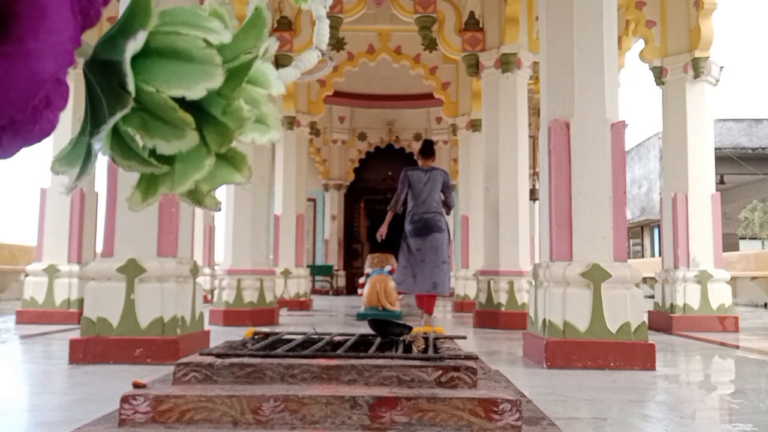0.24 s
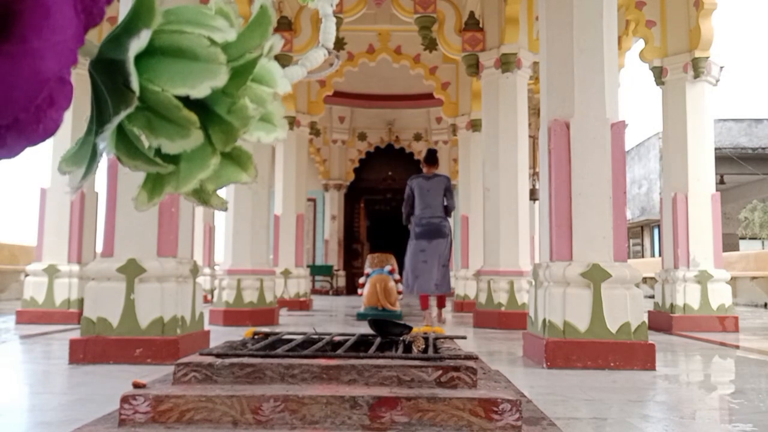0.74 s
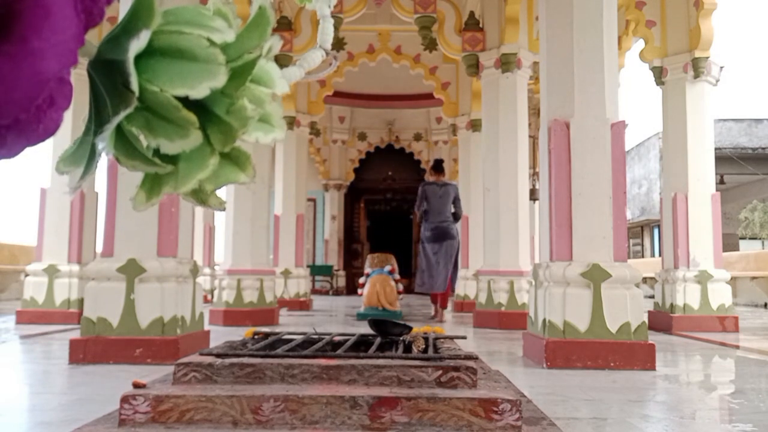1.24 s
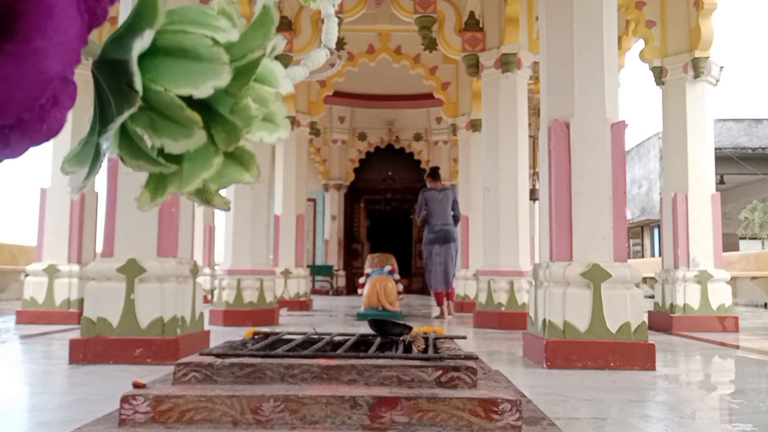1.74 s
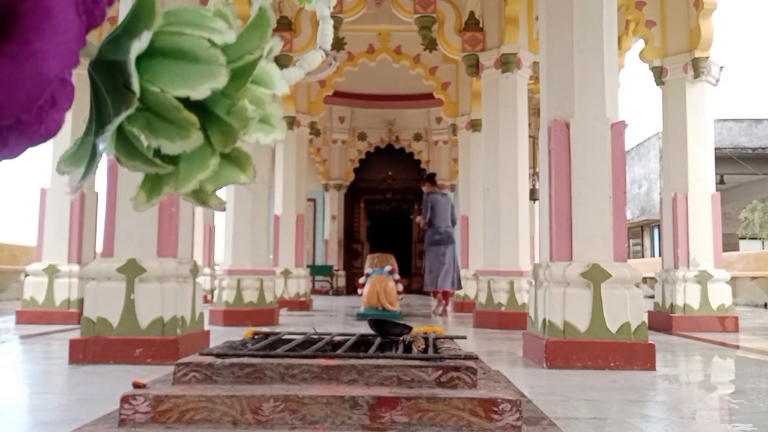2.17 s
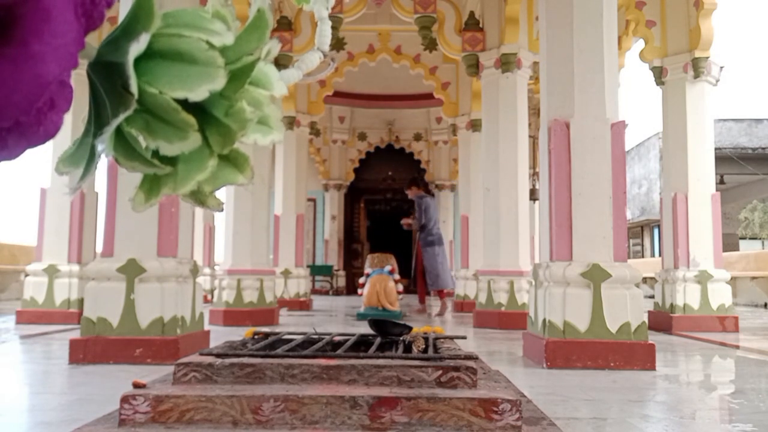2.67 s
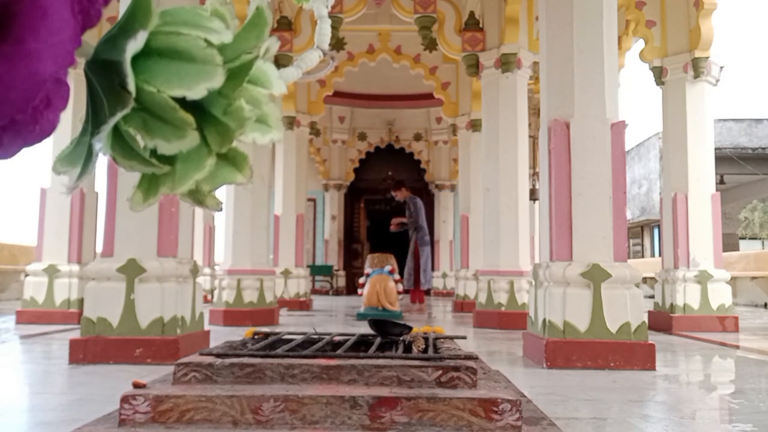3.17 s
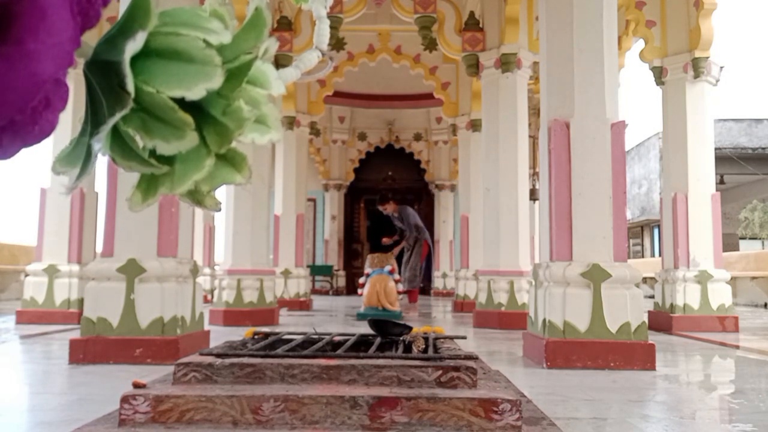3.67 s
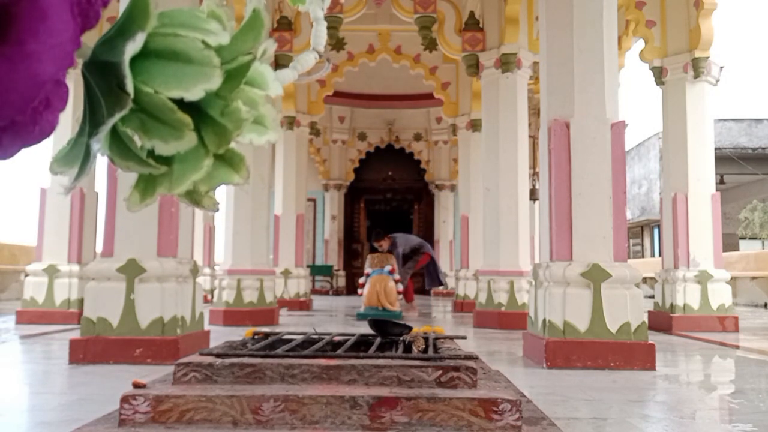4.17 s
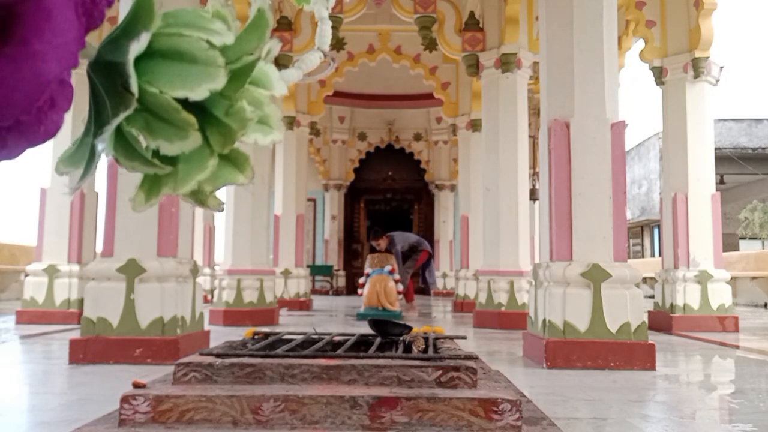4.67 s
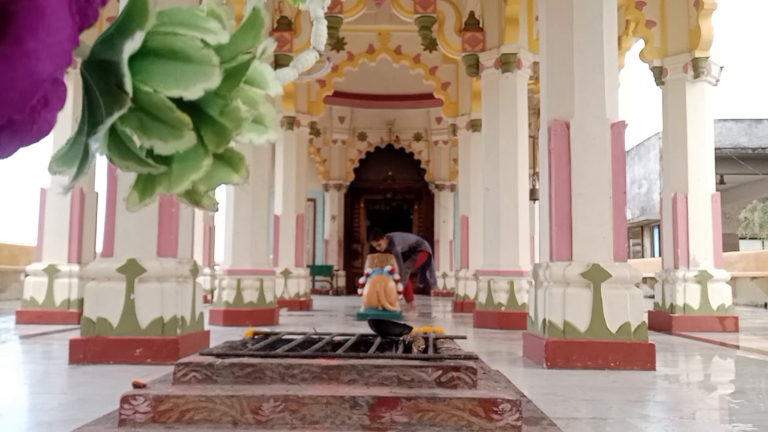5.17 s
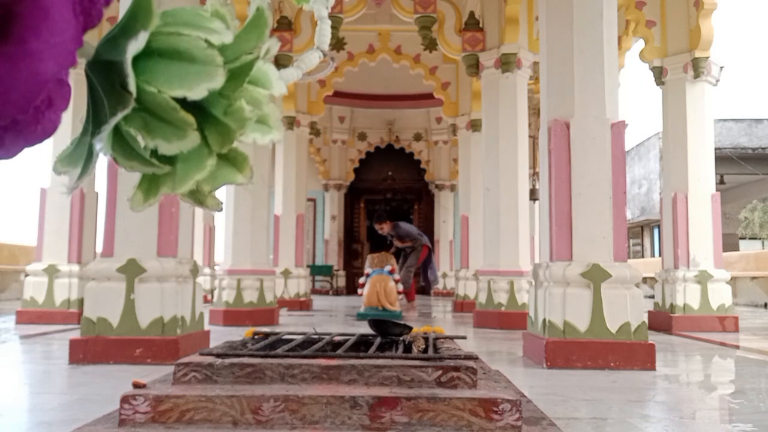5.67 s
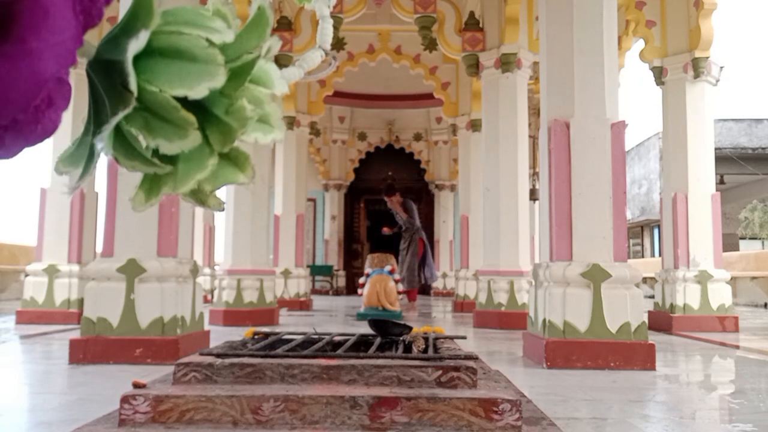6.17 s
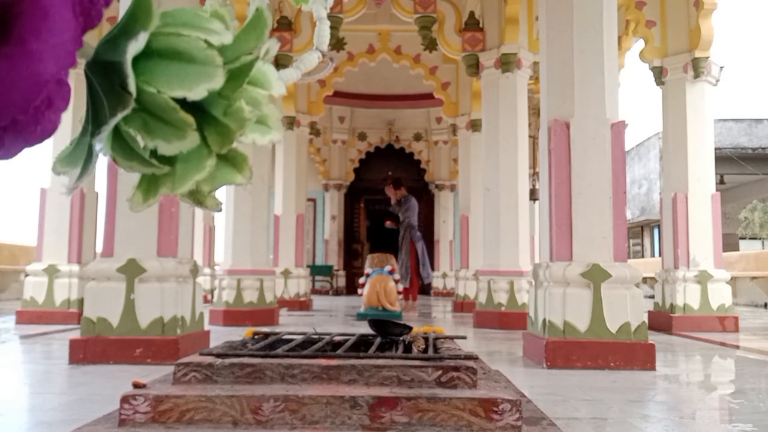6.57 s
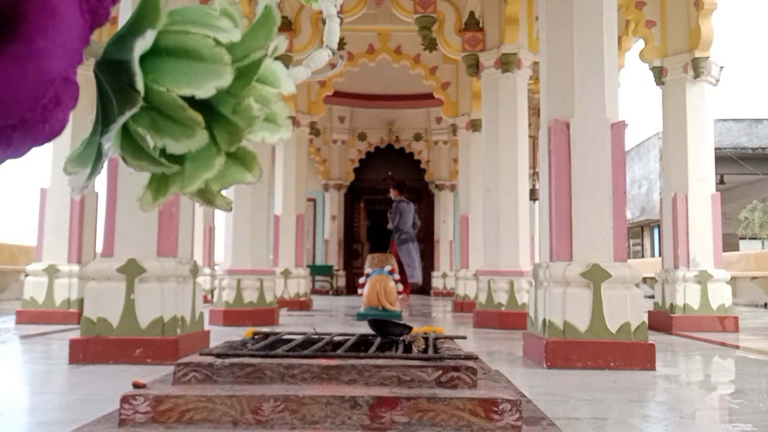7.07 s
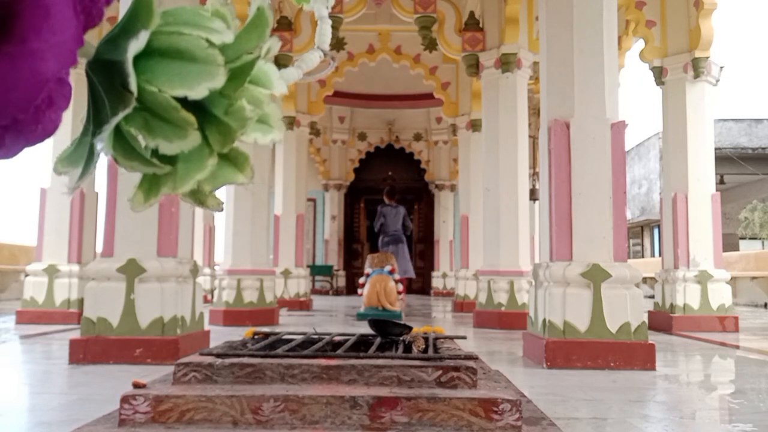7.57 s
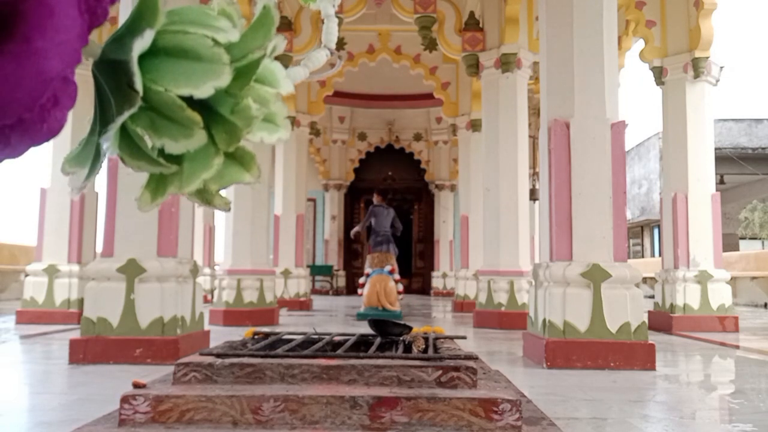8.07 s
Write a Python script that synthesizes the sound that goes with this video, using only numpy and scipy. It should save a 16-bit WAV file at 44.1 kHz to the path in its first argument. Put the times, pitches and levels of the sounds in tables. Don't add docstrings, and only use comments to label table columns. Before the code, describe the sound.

A lively outdoor bird scene in a reverberant pillared porch, picked up in stereo by a phone lying on the floor. Crisp ticks and short chirps run throughout, with a buzzing caller every second or so and a close left-hand singer giving two brief phrases. Low town rumble and a far flock stay behind; a distant motor swells mid-way, drops away after 5 seconds, then returns near the end.

```python
import sys
import numpy as np
from scipy import signal
from scipy.fft import rfft, irfft, next_fast_len
from scipy.io import wavfile
from scipy.ndimage import uniform_filter1d, minimum_filter1d

SR = 44100
rng = np.random.default_rng(int(sys.argv[2]) if len(sys.argv) > 2 else 0)


def rack_gain(trim_db):
    fader = np.asarray(trim_db, float)
    return 10 ** (fader / 20)


def materialize(psi):
    bounded = np.clip(np.atleast_2d(psi).T, -1, 1)
    quanta = np.round(bounded * 32767).astype(np.int16)
    wavfile.write(sys.argv[1], SR, quanta)


N = 366471
T = np.arange(N) / SR

# f/Hz, level/dB per Hz
RUMBLE_SPECTRUM = [(13, -53), (22, -33), (40, -17), (52, -15), (65, -7), (103, -3), (140, 1), (152, -0.5),
                   (178, -5.5), (226, -15), (300, -15), (390, -21), (660, -120)]
TOWN_SPECTRUM = [(120, -24), (200, -1.5), (244, -9.5), (425, -6), (508, -6.5), (687, -12), (878, -10),
                 (1110, -12.5), (1460, -16.5), (1900, -10.5), (2470, -17), (4180, -120)]
FLOCK_SPECTRUM = [(1200, -16), (1600, -19), (2060, 2.5), (2400, 7), (3300, 1), (4000, 1), (6600, -0.5),
                  (9000, -10), (11000, -18.5), (14000, -34)]
WHINE_SPECTRUM = [(400, -32), (445, -3.5), (465, 6.5), (490, -6), (515, -1), (560, -7.5), (650, -9),
                  (720, -35)]
# f/Hz, likeness/0-1
LIKENESS = [(25, .9), (60, 0.98), (130, 0.88), (290, 0.76), (640, 0.24), (1400, 0)]
# t/s, pitch f/Hz, hum level/dB
MOTOR = [(0.0, 139.9, -49), (1.48, 142.1, -50.5), (1.83, 137.2, -52), (2.03, 158.9, -51.5),
         (2.82, 159.4, -50), (2.92, 138.3, -55), (3.66, 143.2, -38.5), (4.16, 144.4, -36.5),
         (4.93, 138.2, -43), (5.34, 139.2, -81), (5.97, 143.7, -80), (6.57, 159.6, -51),
         (6.87, 139.2, -100), (7.12, 146, -73), (7.48, 135, -50), (7.68, 151.3, -41), (8.31, 157.5, -50)]
# t/s, level/dB
BREEZE = [(0.0, -56.5), (1.6, -58.5), (2.03, -54), (2.82, -56), (3.66, -54.5), (4.16, -50), (4.93, -54),
          (5.34, -54.5), (5.97, -61), (6.87, -59), (7.17, -48), (7.48, -54), (8.31, -59.5)]
# t/s, level/dB
FLOCK = [(0.0, -46), (1.3, -56), (1.83, -50.5), (2.92, -51.5), (3.66, -48.5), (4.16, -44.5), (4.93, -54),
         (5.34, -50.5), (5.97, -59.5), (6.57, -54), (6.87, -55), (7.15, -44.5), (7.48, -49.5),
         (7.68, -50.5), (8.31, -58.5)]
# t/s, peak level/dB
THIN_TICKS = [(.283, -33.5), (.3104, -36), (1.0939, -22), (2.3037, -29.5), (2.3184, -38), (3.1242, -26.5),
              (3.3089, -33), (3.4056, -33.5), (4.3356, -29), (4.6744, -19), (6.5504, -20.5),
              (6.3094, -26.5), (6.4809, -32), (6.6954, -25.5), (6.9881, -32.5), (7.5137, -15.5),
              (7.7068, -29.5), (8.2747, -26.5)]
# t/s, peak level/dB
FULL_TICKS = [(.0024, -25.5), (.0202, -40), (.2039, -35), (.2185, -38), (.036, -23.5), (.5766, -19.5),
              (.9774, -24.5), (1.8806, -26.5), (1.95, -30), (2.0227, -33), (2.5163, -32), (2.9872, -35.5),
              (3.045, -28.5), (3.489, -36), (2.0787, -33.5), (3.7579, -27.5), (3.8506, -37.5),
              (3.9828, -29.5), (4.14, -32.5), (4.3203, -23.5), (4.5986, -27.5), (5.0503, -24.5),
              (5.4578, -26), (5.6354, -37.5), (5.8264, -29), (5.8435, -40), (6.6081, -24), (6.663, -42),
              (6.718, -29), (6.92, -32.5), (7.1979, -27.5), (7.4104, -43), (7.8042, -27.5)]
# t/s, peak level/dB
OPEN_TICKS = [(.5415, -43), (2.818, -36.5), (6.7336, -32), (7.1117, -32), (1.2065, -28.5), (1.6165, -38.5),
              (3.1068, -37), (3.1536, -29), (3.723, -28.5), (5.5023, -27.5), (5.8666, -50), (6.148, -29.5),
              (7.8474, -35.5)]
# t/s, peak level/dB, top minus edge level/dB
AIRY_TICKS = [(.352, -20, -13), (.5112, -39, 0), (.7243, -23.5, -11), (2.1845, -23.5, -4.5),
              (2.576, -30, -10.5), (2.665, -27, -16), (3.7424, -40.5, -6), (5.3325, -15, -25),
              (6.0861, -29, -12.5), (6.772, -26.5, 0), (7.2554, -21.5, -15.5), (8.034, -36, -1)]
# delay t/s, left level/dB, right level/dB
TICK_REPEATS = [
    (.0100, -14, -15),
    (.0157, -6, -3),
    (.0175, 1, 3.5),
    (.0236, -13, -15),
    (.0314, -12, -14),
    (.0398, -11, -12),
    (.0445, -13, -15),
]
# t/s, lower voice f/Hz, upper voice f/Hz, voices level/dB, rasp level/dB
BUZZES = [
    (.762, 4940, 5278, -45, -48),
    (1.711, 4933, 5390, -43, -42),
    (2.665, 4860, 5432, -48, -46),
    (4.021, 4945, 5404, -45.5, -44),
    (5.034, 4760, 5252, -45, -48.5),
    (6.112, 4946, 5250, -45.5, -48.5),
    (7.035, 5050, 5555, -47.5, -48.5),
]
# t/s, length t/s, from f/Hz, to f/Hz, rms level/dB
RISES = [(0.015, 0.04, 2087, 2447, -37), (.252, 0.026, 2350, 2760, -50), (.35, 0.025, 1940, 2590, -45),
         (1.232, 0.033, 1957, 2510, -50), (1.855, 0.044, 2200, 2420, -50), (2.553, 0.0053, 3000, 3570, -37),
         (2.997, 0.032, 2250, 2790, -42.5), (3.178, 0.026, 1704, 1950, -49), (3.5, 0.1, 2870, 3240, -48.5),
         (4.494, 0.19, 1895, 2090, -55.5), (3.878, 0.047, 3270, 3710, -42), (4.031, 0.057, 2180, 2804, -37),
         (4.605, 0.045, 2287, 2620, -44.5), (4.646, 0.049, 2600, 3180, -45.5),
         (4.714, 0.046, 1953, 2230, -45.5), (4.924, 0.019, 1810, 1920, -52),
         (6.377, 0.033, 2017, 2660, -56), (6.832, 0.08, 1860, 2090, -54.5),
         (7.448, 0.023, 2120, 2330, -45.5), (7.473, 0.018, 2470, 2860, -43.5),
         (8.052, 0.019, 2270, 2700, -54), (8.214, 0.026, 2047, 2680, -47)]
# t/s, length t/s, from f/Hz, to f/Hz, rms level/dB
FALLS = [(0.074, 0.011, 3030, 2710, -40), (0.216, 0.0087, 3240, 2060, -35.5),
         (1.015, 0.019, 1985, 1770, -52), (1.408, 0.031, 2410, 2210, -55),
         (1.443, 0.0283, 2205, 1810, -49.5), (1.962, 0.013, 3350, 2320, -46),
         (2.295, 0.023, 2115, 1770, -48), (2.591, 0.019, 3330, 3090, -41), (3.452, 0.0215, 1995, 1720, -49),
         (3.657, 0.061, 2565, 2194, -44), (4.113, 0.032, 3370, 3090, -44), (4.706, 0.027, 3325, 3214, -40),
         (7.518, 0.031, 2370, 2250, -48), (5.217, 0.0063, 3080, 2370, -44), (6.487, 0.032, 3060, 2800, -53),
         (7.003, 0.044, 2450, 2040, -56), (7.568, 0.029, 2270, 2000, -45), (7.611, 0.041, 2250, 2213, -45),
         (7.716, 0.1, 1906, 1797, -56), (7.853, 0.042, 2050, 2050, -68), (7.805, 0.031, 2215, 1997, -44),
         (8.027, 0.037, 2660, 2540, -47), (8.045, .016, 2490, 2250, -46), (8.146, 0.029, 2270, 2080, -54),
         (8.179, 0.045, 2080, 2030, -53), (8.272, 0.031, 2250, 1970, -47)]
# t/s, length t/s, f/Hz, rms level/dB, extra echo level/dB
PEEPS = [(0.082, 0.024, 2717, -41, -4), (.125, 0.091, 2764, -48, -2), (0.22, 0.013, 2157, -39.5, -8),
         (.235, 0.059, 2203, -49, -11), (0.632, 0.027, 3480, -58, -1), (.69, 0.04, 3520, -47, -7),
         (.762, .015, 3480, -60, -2), (1.369, 0.14, 4550, -66, -5), (1.5, 0.2, 4730, -65, 1),
         (1.537, 0.049, 1940, -47, -12), (1.91, 0.11, 4790, -55, -3), (3.425, 0.026, 2360, -38, -5),
         (3.925, 0.051, 3650, -54, -3), (3.2, 0.092, 1960, -49.5, -12), (3.2, 0.063, 1760, -55, -9),
         (5.195, 0.017, 3275, -44, -6), (6.182, 0.054, 3125, -51, -14), (6.886, 0.055, 2790, -56, -14),
         (7.064, 0.039, 2475, -40.5, -24), (7.11, 0.17, 1638, -54, -3.5), (7.67, 0.048, 1953, -49.5, -4),
         (7.615, .04, 1940, -47.5, -10), (8.18, 0.028, 2350, -54, -5), (7.98, 0.025, 2800, -60, -6)]
# t/s, length t/s, from f/Hz, to f/Hz, rms level/dB
SONG = [(2.07, 0.017, 2700, 2720, -38), (2.084, 0.025, 2757, 2230, -33.5), (2.1, 0.012, 2180, 3170, -35.5),
        (2.148, 0.014, 3070, 3200, -50), (2.252, 0.014, 2784, 2340, -35), (2.271, .01, 2320, 2025, -35),
        (2.35, .013, 2185, 3210, -34), (2.367, 0.015, 3315, 2880, -44), (2.378, 0.082, 2965, 2259, -37.5),
        (2.609, 0.021, 2450, 2246, -50), (5.284, 0.019, 2890, 2670, -47), (5.302, 0.0243, 2730, 2424, -39),
        (5.321, 0.0094, 2456, 2150, -36.5), (5.327, 0.0116, 2330, 2990, -33.5),
        (5.479, 0.012, 3040, 2460, -34), (5.487, 0.016, 2405, 2050, -34), (5.437, 0.033, 2294, 2760, -45),
        (5.551, 0.014, 2173, 3030, -34.5), (5.557, 0.068, 3000, 2466, -36.5),
        (5.635, 0.026, 2725, 2143, -37)]
# delay t/s, left level/dB, right level/dB
FAR_WALLS = [
    (.036, -11, -12),
    (.062, -8, -9),
]
# f/Hz, level/dB
LEFT_COLOUR = [(300, -0.5), (1300, 8.5), (2400, 5), (5000, 4.5), (6700, 3), (7500, -4), (8300, -8),
               (9000, -32), (10000, -10.5), (14000, -36), (15600, -23), (16400, -44)]
RIGHT_COLOUR = [(300, -0.5), (1300, 6), (2400, 1), (5000, 2), (6700, -6), (8200, 0.5), (9300, 1),
                (10200, -3.5), (11500, -10.5), (14000, -27), (15600, -9), (16400, -47)]
# f/Hz, left share/0-1, right share/0-1
EMPTY_TREBLE = [(8000, 0, 0), (8700, .6, 0), (9400, .7, .05), (10300, .75, .55), (15000, .7, .6)]

SIDE_LAG, FRONT_LAG = 14, 17


def unit(x):
    return x / np.sqrt(np.mean(x ** 2))


def on_log(hz, table):
    table_hz, values = np.transpose(table)
    return np.interp(np.log(hz + 1), np.log(table_hz), values)


def colour(x, table):
    size = next_fast_len(N)
    gain = rack_gain(on_log(np.fft.rfftfreq(size, 1 / SR), table))
    return irfft(rfft(x, size) * gain, size)[..., :N]


def band(x, hz, width_hz):
    edges = [hz - width_hz / 2, hz + width_hz / 2]
    return signal.sosfilt(signal.butter(1, edges, "band", fs=SR, output="sos"), x)


def walk(rate, size=N):
    hold = int(SR / rate)
    knots = np.repeat(rng.standard_normal(size // hold + 2), 16)
    knots = uniform_filter1d(uniform_filter1d(knots, size=16), size=16)
    return 1.4 * np.interp(np.arange(size) * 16 / hold, np.arange(len(knots)), knots)


def follow(table, column=1):
    columns = np.transpose(table)
    return np.interp(T, columns[0], columns[column])


def late_left(x, lag):
    return np.array([np.roll(x, lag), x])


def yard(x, t60, rise, hold, wet_db):
    t = np.arange(SR) / SR
    fall = rack_gain(-60 * np.maximum(t - hold, 0.63 * t) / t60) * (1 - np.exp(-(t / rise) ** 2))
    grain = rack_gain(5 * rng.standard_normal((2, SR)) + np.array([walk(150, SR), walk(150, SR)]))
    tail = rng.standard_normal((2, SR)) * grain * fall
    tail = tail / np.sqrt(np.sum(tail ** 2, axis=1, keepdims=True))
    return rack_gain(wet_db) * signal.fftconvolve(x[None], tail, axes=1)[:, :N]


def wash(table, db, flicker_db, swell_db):
    size = next_fast_len(N)
    hz = np.fft.rfftfreq(size, 1 / SR)
    like = np.clip(on_log(hz, LIKENESS), 0, 1)
    mid, side = rfft(rng.standard_normal((2, size)))
    pair = np.sqrt(1 + like) * mid + np.sqrt(1 - like) * side * np.array([[1], [-1]])
    pair = rack_gain(on_log(hz, table)) * pair
    out = 0
    for octave in np.arange(np.log2(table[0][0]), np.log2(table[-1][0]) + .5, .5):
        share = np.clip(1 - np.abs(np.log2(hz + 1) - octave) * 2, 0, 1)
        level = rack_gain(flicker_db * walk(12) + swell_db * walk(3.233))
        out = out + irfft(pair * share, size)[:, :N] * level
    return unit(out) * rack_gain(db)


def town():
    calm_db = -52.5
    breeze_db, hum_db = follow(BREEZE), follow(MOTOR, 2)
    rumble_db = -45.5 + 0.2 * (breeze_db - calm_db) + 0.068 * (hum_db - calm_db)
    return wash(RUMBLE_SPECTRUM, rumble_db, 2.3, 1.0) + wash(TOWN_SPECTRUM, breeze_db + 2, 2.05, 0.39)


def flock():
    return wash(FLOCK_SPECTRUM, follow(FLOCK) + 1.5, 0.16, 1.36)


def motor():
    hz, hum_db = follow(MOTOR), follow(MOTOR, 2)
    hum = np.sqrt(2) * rack_gain(hum_db - 2.5 + 1.1 * walk(2.78)) * np.sin(2 * np.pi * np.cumsum(hz) / SR)
    idle_s, fade_s, idle_db = 4.95, 0.025, -13.5
    whine_db = follow(BREEZE) - 0.7 + idle_db * np.clip((T - idle_s) / fade_s, 0, 1)
    return hum + wash(WHINE_SPECTRUM, whine_db, 1.2, 0.26)


def ticks():
    edge, body, top, sent = np.zeros((4, N))
    kinds = [(THIN_TICKS, -6.5, -29, -1.6), (FULL_TICKS, 1.5, -18.5, -1.4),
             (OPEN_TICKS, -1.4, -16.5, -3.5), (AIRY_TICKS, -4, 0, -2)]
    for table, body_db, top_db, echo_db in kinds:
        s, db, *own_top_db = np.transpose(table)
        at = (s * SR).astype(int) + 10
        edge[at] = rack_gain(db)
        body[at] = rack_gain(db + body_db)
        top[at] = rack_gain(db + top_db + sum(own_top_db))
        sent[at] = rack_gain(echo_db)
    sent = -minimum_filter1d(-sent, size=201)
    snap = 16 * band(band(band(edge, 8040, 3000), 5650, 2010), 6740, 3120)
    snap += 9 * band(band(body, 3330, 1970), 4290, 1750)
    snap += 9 * band(band(top, 13300, 5000), 12500, 5000)
    tick_lag, repeat_lag = 23, 5
    bounce = snap
    for delay, left_db, right_db in TICK_REPEATS:
        repeat = late_left(np.roll(snap, int(delay * SR)), repeat_lag)
        bounce = bounce + rack_gain([[left_db], [right_db]]) * repeat
    bounce[0] = np.roll(bounce[0], tick_lag)
    return bounce + yard(snap * sent, t60=0.64, rise=.016, hold=0.0029, wet_db=7.5)


def tone(hz, gain, wobble):
    tremble = walk(260.5, len(hz))
    course = hz * (1 + wobble * (tremble - tremble.mean()))
    return np.sqrt(2) * gain * np.sin(2 * np.pi * np.cumsum(course) / SR)


def buzz_rasp(pulses, late):
    low = 0.79 * unit(band(band(pulses, 4430, 830), 4400, 900)) * late
    middle = 0.7 * unit(band(band(pulses, 4770, 1200), 4570, 990))
    return low + middle + 0.5 * unit(band(band(pulses, 6730, 830), 5800, 900))


def buzzes():
    out, sent = np.zeros((2, N))
    t = np.arange(SR // 4) / SR
    length_s, attack_s, release_s = 0.16, 0.017, 0.016
    held = np.clip(np.minimum(t / attack_s, (length_s - t) / release_s), 0, 1)
    late = np.clip((t - 0.025) / 0.041, 0, 1)
    slide = 1 - 0.0478 * np.exp(-t / 0.0075)
    throat_hz = 3100 + (4170 - 3100) * t / length_s

    def hoarse(db):
        return unit(rack_gain(db * walk(201.4, len(t))))

    for s, lower_hz, upper_hz, lower_db, rasp_db in BUZZES:
        voices = tone(upper_hz * slide, rack_gain(lower_db - 3.5 - 10 * t) * hoarse(3.5), .006)
        voices += tone(lower_hz * slide, rack_gain(lower_db - 40 * t) * hoarse(3.5), .006)
        rate_hz = 320 * (1 + .06 * walk(25, len(t)))
        call = 0
        for k in range(1, 5):
            line_hz = lower_hz - k * rate_hz
            near_throat = 0.3 + np.exp(-((line_hz - throat_hz) / 260) ** 2)
            call += tone(line_hz, rack_gain(rasp_db - 4.5) * near_throat * late * hoarse(5), .014)
        pulses = np.diff(np.floor(np.cumsum(rate_hz) / SR), prepend=0) * rack_gain(2.5 * walk(300, len(t)))
        pulses += 0.55 * 0.11 * rng.standard_normal(len(t))
        call = call + rack_gain(rasp_db) * buzz_rasp(pulses, late)
        at = slice(int(s * SR), int(s * SR) + len(t))
        out[at] = (call + voices) * held
        sent[at] = (call + rack_gain(-4.5) * voices) * held
    return rack_gain(-1.5) * late_left(out, FRONT_LAG) + yard(sent, t60=0.61, rise=0.0019, hold=0.044, wet_db=0.5)


def notes():
    song = [(*row, -1.95, 1) for row in SONG]
    glides = [(*row, -5.5, 0) for row in [*RISES, *FALLS]]
    peeps = [(s, length, hz, hz, db, wet_db, 0) for s, length, hz, db, wet_db in PEEPS]
    return song + glides + peeps


def whistles():
    direct, echoed = np.zeros((2, N)), np.zeros(N)
    near_db = -37.5
    for s, length, from_hz, to_hz, direct_db, wet_db, who in notes():
        way = np.linspace(0, 1, int(length * SR))
        hz = from_hz + (to_hz - from_hz) * way
        swell = np.abs(np.sin(np.pi * way)) ** .5
        at = slice(int(s * SR), int(s * SR) + len(way))
        echo_db = -35.5 + 0.78 * (direct_db - near_db) + wet_db
        far_db = max(near_db - direct_db, 0) * (from_hz != to_hz)
        tremble = .35 if from_hz == to_hz else 1
        flutter = unit(rack_gain((2.5 + .1 * far_db) * walk(93, len(way))))
        wobble = tremble * (28 + 2 * far_db) / hz
        direct[who, at] += tone(hz, swell * rack_gain(direct_db) * flutter, wobble)
        warble = unit(rack_gain(5 * walk(183, len(way))))
        echoed[at] += tone(hz, swell * rack_gain(echo_db) * warble, tremble * 85 / hz)
    others, singer = direct
    pan_db = 5
    heard = late_left(others, FRONT_LAG)
    heard = heard + rack_gain([[pan_db / 2], [-pan_db / 2]]) * late_left(singer, SIDE_LAG)
    for delay, left_db, right_db in FAR_WALLS:
        k = int(delay * SR)
        returned = np.array([np.roll(echoed, k), np.roll(echoed, k + SIDE_LAG)])
        heard += rack_gain([[left_db], [right_db]]) * returned
    return heard + yard(echoed, t60=0.5, rise=.007, hold=0.065, wet_db=3.2)


def thin_treble(x):
    hz, _, cells = signal.stft(x, SR, nperseg=1024)
    power = uniform_filter1d(np.abs(cells) ** 2, size=9, axis=1)[:, 4::9] + 1e-20
    whim_db = 9 * uniform_filter1d(rng.standard_normal(power.shape), size=2, axis=2)
    db = 10 * np.log10(np.abs(power)) + whim_db
    rank = np.argsort(np.argsort(db, axis=2), axis=2) / db.shape[2]
    edge_hz, *shares = np.transpose(EMPTY_TREBLE)
    empty = np.array([np.interp(hz[4::9], edge_hz, share) for share in shares])
    keep = np.repeat(rank >= empty[:, :, None], 9, axis=1)[:, :len(hz)]
    return signal.istft(cells * keep, SR, nperseg=1024)[1][:, :N]


def scene():
    return town() + flock() + motor() + ticks() + buzzes() + whistles()


def roll_off(x):
    return signal.sosfilt(signal.butter(12, 16460, fs=SR, output="sos"), x)


def record(dry):
    coloured = np.array([colour(dry[0], LEFT_COLOUR), colour(dry[1], RIGHT_COLOUR)])
    mix = thin_treble(coloured)
    return roll_off(mix)


dry = scene()
out = record(dry)
materialize(out)
```